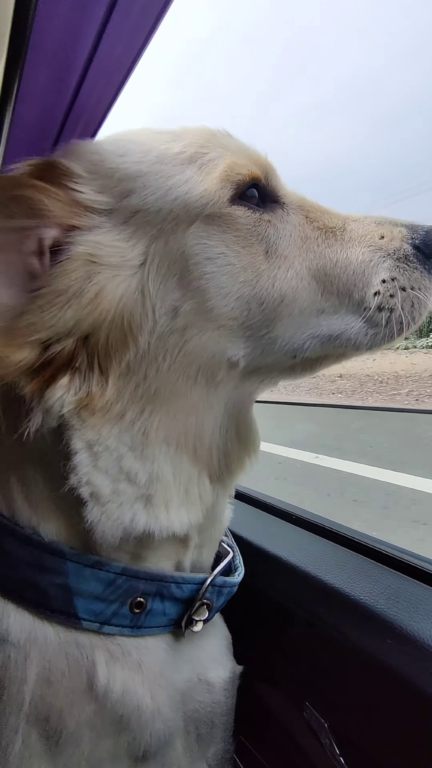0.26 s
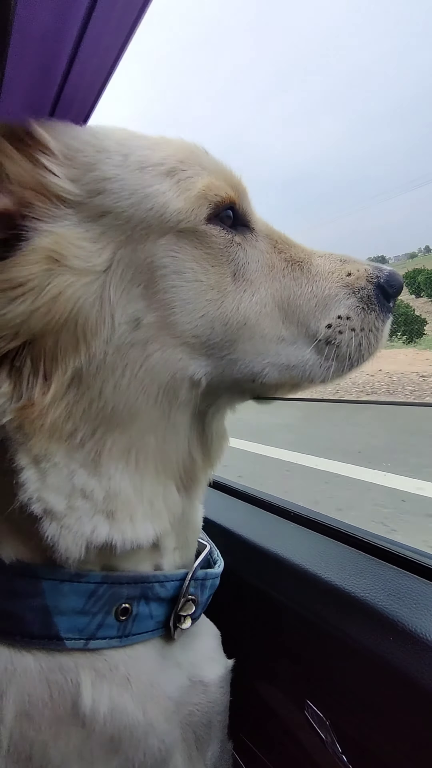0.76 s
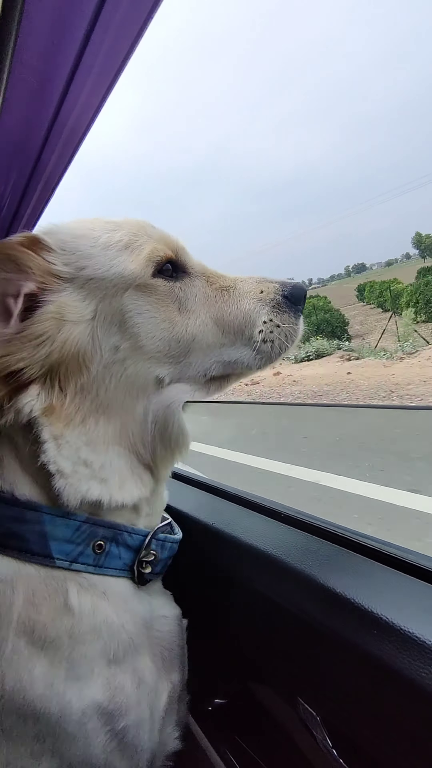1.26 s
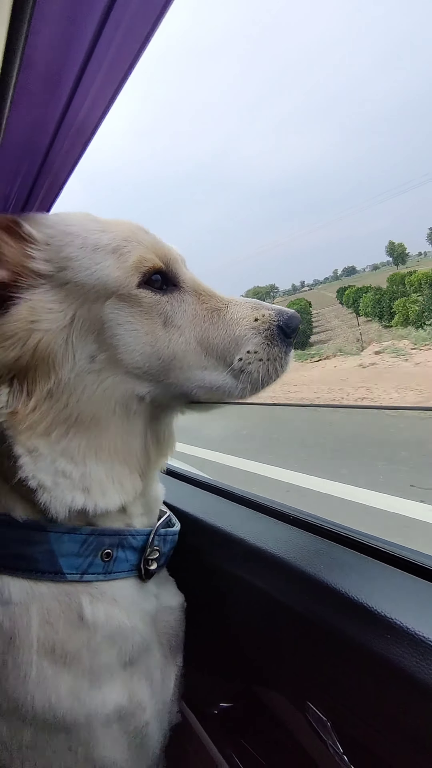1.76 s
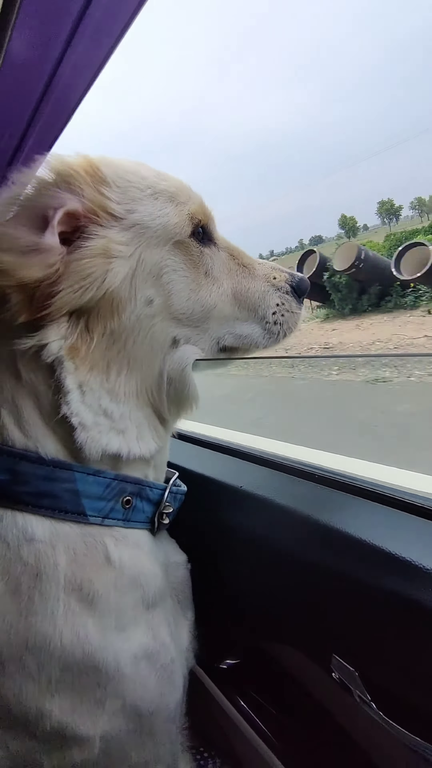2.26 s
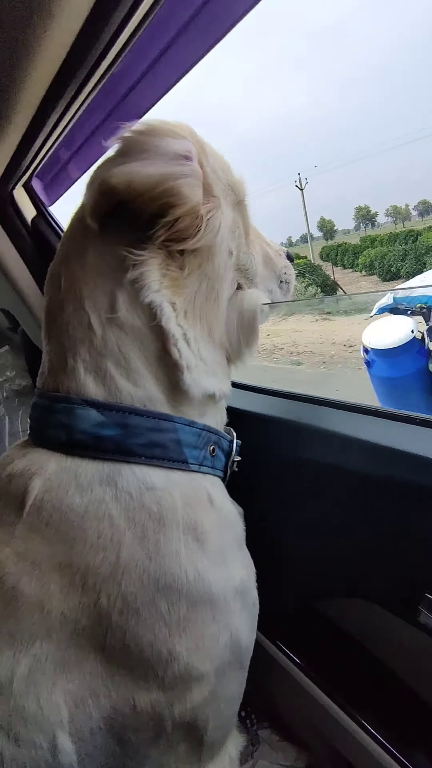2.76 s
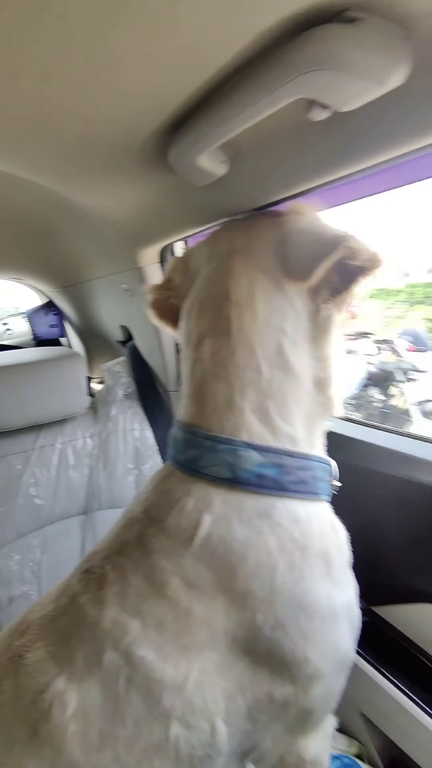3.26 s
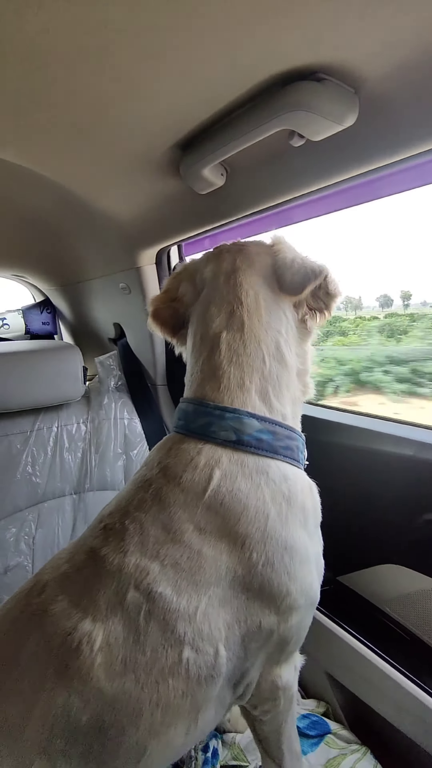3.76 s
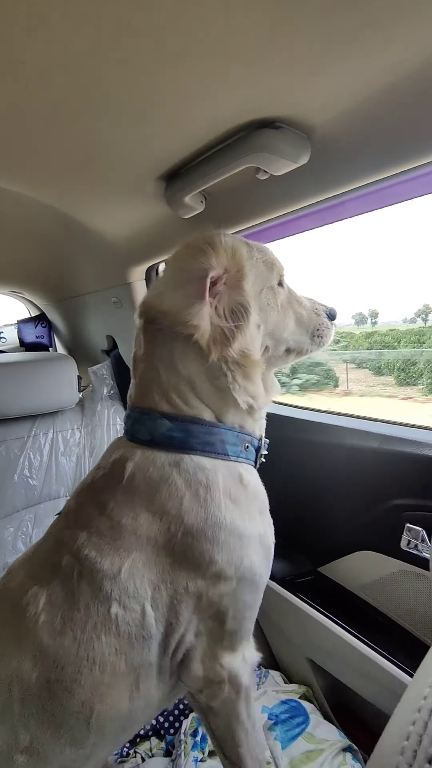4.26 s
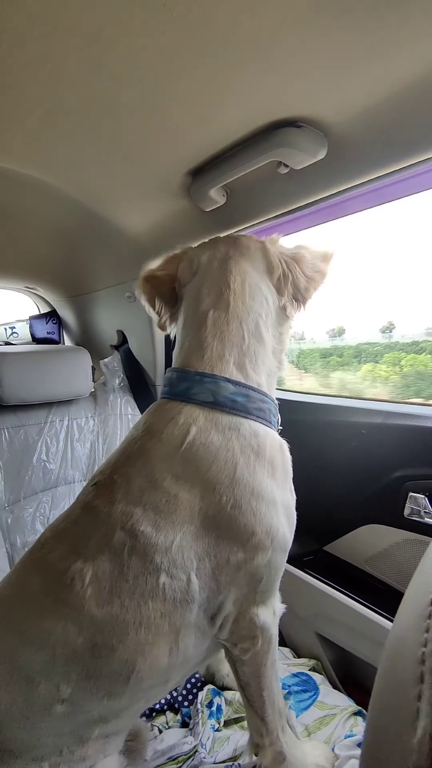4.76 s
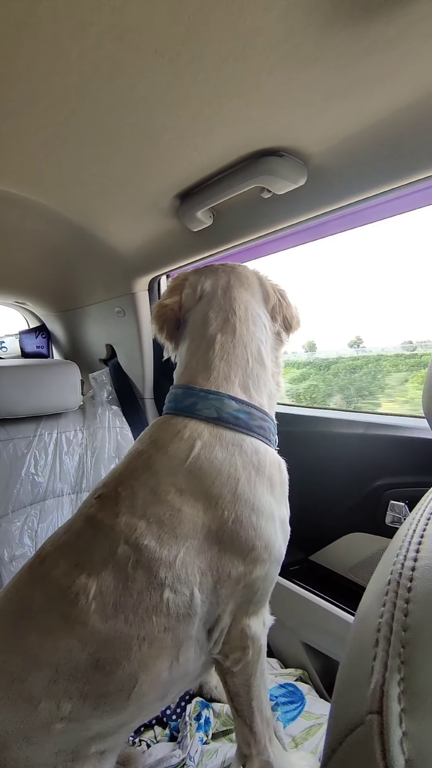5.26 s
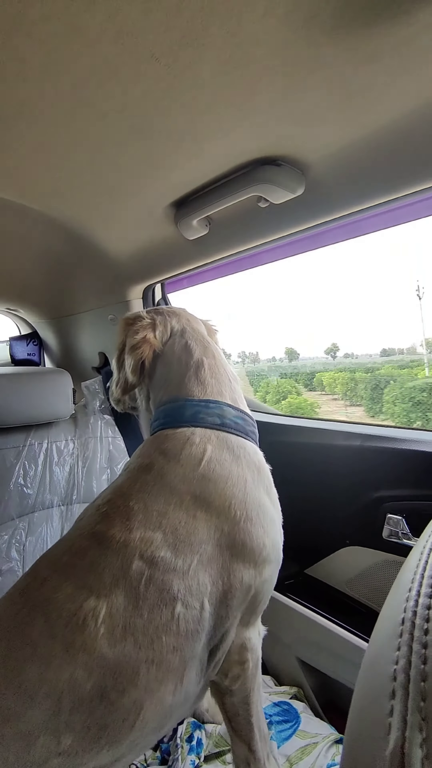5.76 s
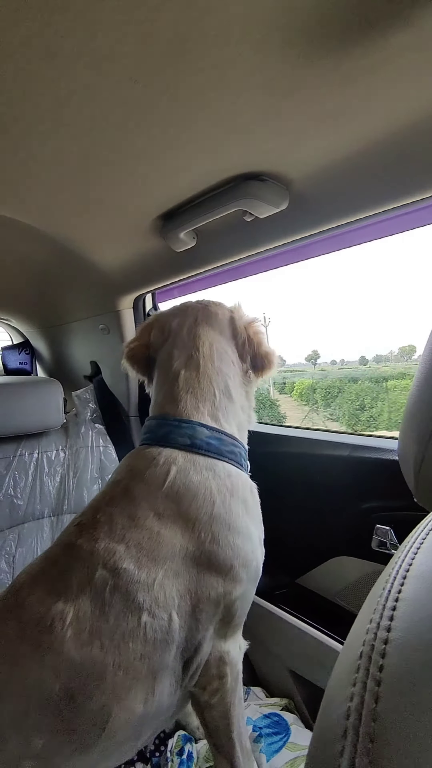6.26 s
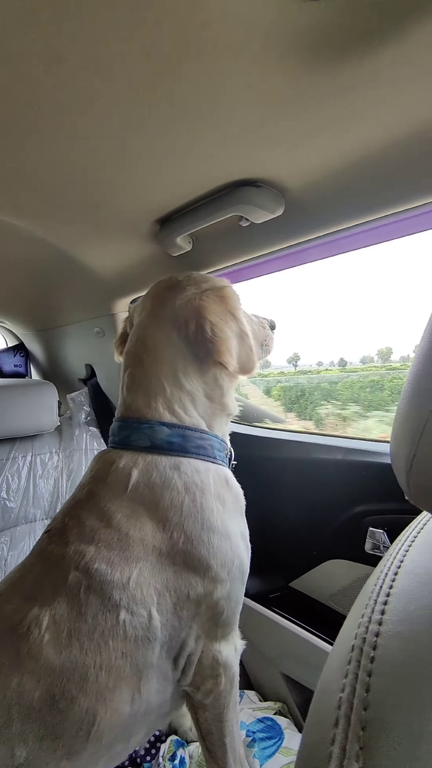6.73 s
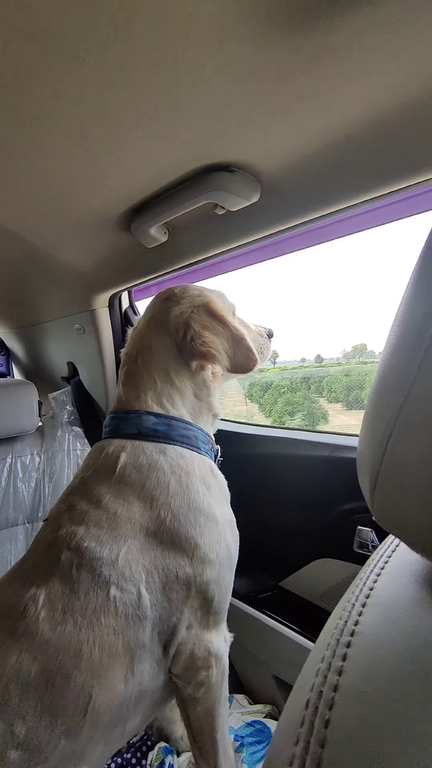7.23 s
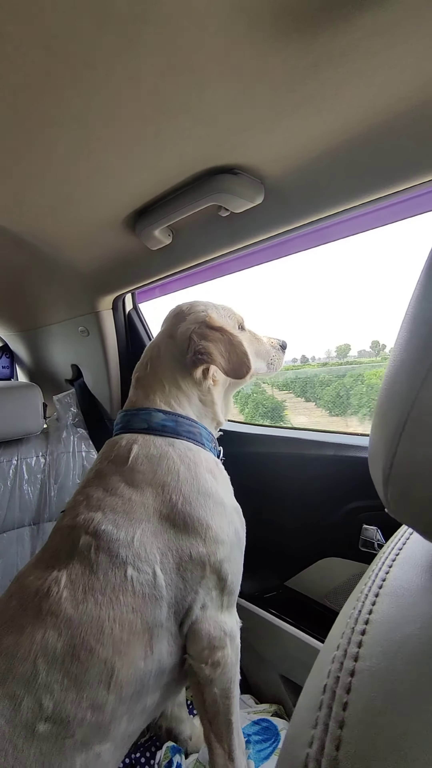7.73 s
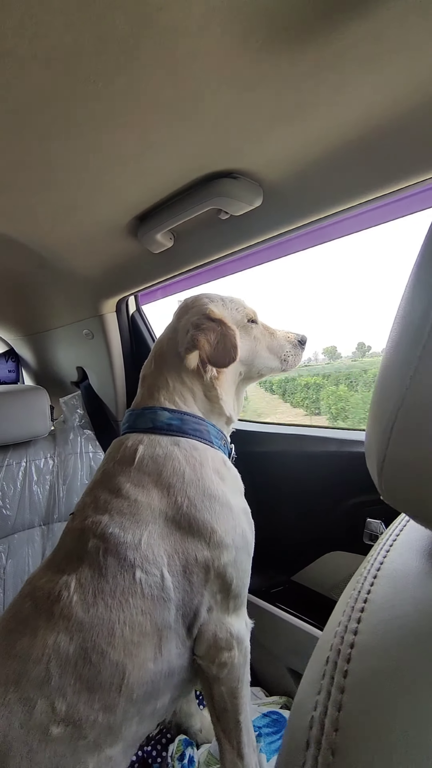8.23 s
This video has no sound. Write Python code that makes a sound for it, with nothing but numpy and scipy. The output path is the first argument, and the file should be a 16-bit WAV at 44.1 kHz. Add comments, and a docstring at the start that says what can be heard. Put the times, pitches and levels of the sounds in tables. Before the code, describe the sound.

From inside a car with one window down, deep wind buffeting and tyre rumble run throughout. A diesel tractor draws near, its exhaust droning and its engine clattering close by, with a tinny jingle and a rising rasp as it drops behind. A quick motorbike swish and a fluttering hiss of wind follow. The cabin then settles to softer rumble and gusts, with occasional light ticks and rustles.

```python
"""Inside a car on a country road, one side window down: wind buffets the cabin over low road rumble.
The car overtakes a diesel tractor, whose firings drone and bark out of the exhaust and clatter in the
engine. Loose metal jingles as it goes by; its rasp climbs as it falls behind and a faint whine lingers.
A motorbike swishes by just after it, gusts hiss over the glass, and a few rustles and ticks sound in
the cabin."""
import sys
import numpy as np
from scipy import signal
from scipy.fft import rfft, irfft, next_fast_len
from scipy.io import wavfile
from scipy.ndimage import uniform_filter1d, minimum_filter1d, map_coordinates

SR = 44100
rng = np.random.default_rng(int(sys.argv[2]) if len(sys.argv) > 2 else 0)


def unload_wav(signal):
    """Save mono or channel-first audio to the path in sys.argv[1] as 16-bit WAV at rate SR, clipped to [-1, 1]."""
    wavfile.write(
        sys.argv[1],
        SR,
        np.round(np.clip(np.atleast_2d(signal).T, -1, 1) * 32767).astype(np.int16),
    )


N = 374407
TIME = np.arange(N) / SR
SIDES = np.array([[1], [-1]]) / 2  # splits a difference between left and right


def amp(db):
    """Decibels to gain."""
    return 10 ** (np.asarray(db) / 20)


def unit(x):
    """Scale to rms 1."""
    return x / np.sqrt(np.mean(x ** 2) + 1e-20)


def along(points, hz):
    """Read a curve of (frequency, value) points on a log axis."""
    f, v = np.transpose(points)
    return np.interp(np.log(hz + 1), np.log(f + 1), v)


def curves(rows):
    """One automation lane for each column after the time."""
    times, *columns = np.transpose(rows)
    return [np.interp(TIME, times, column) for column in columns]


def wobble(rate):
    """A smooth random curve, rate knots a second."""
    return map_coordinates(rng.standard_normal(int(N * rate / SR) + 4), [np.arange(N) * rate / SR])


def swells(rows):
    """A sum of bell shapes from rows of (time, height, half length)."""
    return sum(height * np.exp(-((TIME - s) / half) ** 2 / 2) for s, height, half in rows)


def fades(rows):
    """A gain envelope of swells whose heights are given in dB."""
    return swells([(s, amp(db), half) for s, db, half in rows])


def filtered(x, response):
    """Filter x by a complex response of frequency."""
    size = 2 * next_fast_len((N + SR) // 2)
    return irfft(rfft(x, size) * response(np.fft.rfftfreq(size, 1 / SR)), size)[..., :N]


def struck(x, spectrum):
    """Filter x at minimum phase, so it rings only after each hit."""
    def response(hz):
        cepstrum = irfft(np.log(amp(along(spectrum, hz))))
        cepstrum[1:len(cepstrum) // 2] *= 2
        cepstrum[len(cepstrum) // 2 + 1:] = 0
        return np.exp(rfft(cepstrum))
    return filtered(x, response)


def ringing(modes, hz):
    """Complex response of a few resonances of alternating polarity."""
    return sum((-1) ** k * amp(db) * 1j * hz * width / (centre ** 2 - hz ** 2 + 1j * hz * width)
               for k, (centre, width, db) in enumerate(modes))


def resonate(x, modes):
    """Ring x through a few resonances, at rms 1."""
    return unit(filtered(x, lambda hz: ringing(modes, hz)))


def gliding(x, centre_hz, width_hz):
    """Ring x through one swept resonance, at rms 1."""
    carrier = np.exp(2j * np.pi * np.cumsum(centre_hz) / SR)
    lowpass = signal.butter(2, width_hz / 2, fs=SR, output="sos")
    return unit((carrier * signal.sosfilt(lowpass, x / carrier)).real)


def from_window(x, lead_ms, left_db):
    """Place x in stereo: the left side leads by lead_ms; left_db is left minus right."""
    advance = SIDES * lead_ms / 1000
    return amp(SIDES * left_db) * filtered(x, lambda hz: np.exp(2j * np.pi * hz * advance))


# How alike left and right sound: mono in the bass and top treble, wider between:
# (frequency [Hz], coherence [0-1])
COHERENCE = [(12, 1), (35, 1), (70, 1), (250, 0.93), (500, 0.63), (900, 0.68), (1500, 0.25), (5000, 0.49),
             (6200, 0.59), (8000, 0.94)]
def noise(spectrum, patchy_db):
    """Coloured stereo noise of rms 1, with eddies as patches of random gain."""
    tiles = signal.stft(rng.standard_normal((2, N)), nperseg=512)[2]
    patches = uniform_filter1d(rng.standard_normal(tiles.shape[1:]), size=7, axis=0)
    patches = uniform_filter1d(patches, size=12, axis=1)
    pair = signal.istft(tiles * amp(patchy_db * unit(patches)), nperseg=512)[1][:, :N]

    def colour_and_width(hz):
        angle = np.arccos(np.clip(along(COHERENCE, hz), -1, 1)) / 2
        return amp(along(spectrum, hz)) * [np.cos(angle), np.sin(angle)]
    mid, side = filtered(pair, colour_and_width)
    return unit(np.array([mid + side, mid - side]))


def steadied(x, seconds):
    """Even out the slow swells of a noise, keeping its quick flutter."""
    power = uniform_filter1d(np.mean(x ** 2, axis=0), size=max(int(seconds * SR), 1))
    return x / np.sqrt(np.abs(power) + 1e-6)


# Airflow at the window, also riding the road layer: (time [s], boom level [dB], rush level [dB])
AIRFLOW = [(0, -21, -45), (.6, -19, -46.5), (1.0, -17, -42), (2.5, -19.5, -42), (3.65, -18, -37.5),
           (4.14, -20, -43.5), (4.28, -26, -47), (4.5, -28.5, -53), (5.0, -31, -54.5), (6.0, -27, -55),
           (6.7, -24.5, -52.5), (7.7, -21.5, -47.5), (8.2, -21.5, -47.5), (8.49, -18.5, -48)]
# Strong gusts: (time [s], throb lift [dB], half length [s])
GUSTS = [(.31, 5, 0.07), (.56, 8.5, 0.033), (1.95, 7, 0.059), (3.62, 5.5, 0.077), (4.3, 9.5, 0.27),
         (5.1, 6.5, 0.045), (5.67, 4.5, 0.17), (6.8, 5.5, 0.28), (7.48, 5, 0.04), (8.0, 5.5, 0.061)]
# Sub-bass throb and bass boom of the cabin air: (frequency [Hz], level [dB])
THROB_EQ = [(4, -9), (11, -1), (18, 7.5), (26, -6.5), (36, -14), (55, -46.5), (90, -26.5), (200, -100.5)]
BOOM_EQ = [(18, -7.5), (30, 3), (45, -3.5), (62, -5.5), (85, -5), (120, -16.5), (170, -23), (260, -28),
           (500, -40), (1500, -110)]
def wind():
    """Air spilling through the window pumps the cabin: a gusting throb and a lumpy boom above it."""
    boom_db, _ = curves(AIRFLOW)
    throb_db = -18 + 1.5 * wobble(rate=4) + swells(GUSTS)
    throb = amp(throb_db) * steadied(noise(THROB_EQ, patchy_db=0), seconds=0.15)
    boom = amp(boom_db) * steadied(noise(BOOM_EQ, patchy_db=2), seconds=0.13)
    # eddies brush each side separately
    eddies = unit(filtered(rng.standard_normal((2, N)), lambda hz: amp(along(THROB_EQ, hz))))
    return throb + amp(throb_db - 12) * eddies + from_window(boom, lead_ms=0.13, left_db=0.5)


# Road rumble and rushing air: (frequency [Hz], level [dB])
RUMBLE_EQ = [(60, -12), (95, 8.5), (140, -1), (200, 4), (265, -4.5), (330, -8), (400, -12.5), (500, -16),
             (650, -22.5), (900, -24), (1500, -34), (3000, -67.5), (8000, -100)]
RUSH_EQ = [(250, -3.5), (400, 1), (530, 5), (680, 2.5), (950, 3.5), (1100, -3.5), (1260, -2.5), (1450, -5),
           (1700, -2), (2050, -4.5), (2650, -8.5), (3200, -16), (4000, -14), (5300, -19), (6400, -15.5),
           (7400, -31), (12000, -50.5), (15500, -59.5)]
# The cabin tips the rush to one side: (frequency [Hz], left minus right [dB])
RUSH_PAN = [(60, 5), (120, 0.5), (240, -7.5), (480, 5), (950, 6.5), (1890, -1), (3770, -3.5), (7520, 8.5),
            (15000, -2.5)]
# Note of the window frame: (frequency [Hz], width [Hz], level [dB])
FRAME_MODES = [(1249, 22, 0)]
# Extra swell of that note: (time [s], level [dB], half length [s])
WHISTLE_SWELL = [(6.911, -70, 0.48)]
def road():
    """Tyres rumble through the body while air rushes and faintly sings along the window frame."""
    boom_db, rush_db = curves(AIRFLOW)
    eddies = wobble(rate=10)
    rumble_db = -36.5 + (boom_db - boom_db.mean()) + 0.22 * eddies
    rumble = amp(rumble_db) * noise(RUMBLE_EQ, patchy_db=-0.5)
    air = filtered(noise(RUSH_EQ, patchy_db=1.9), lambda hz: amp(along(RUSH_PAN, hz) * SIDES))
    rush = amp(rush_db + 0.17 * eddies) * air
    singing = (amp(rush_db - 13.5) + fades(WHISTLE_SWELL)) * amp(1.4 * wobble(rate=3.7))
    note = filtered(rng.standard_normal((2, N)), lambda hz: ringing(FRAME_MODES, hz) * (hz < 2000))
    return from_window(rumble + rush + singing * unit(note), lead_ms=0.12, left_db=-1.7)


def metres_ahead():
    """How far the tractor is ahead of the window as the car overtakes."""
    abreast_s, overtake_m_per_s = 2.551, 4.54
    return overtake_m_per_s * (abreast_s - TIME)


# Each tractor layer beams into the window from one spot along the pass:
# layer: (base level [dB], beam boost [dB], spot ahead [m], beam half width [m], loss when hidden [dB])
TRACTOR_BEAMS = { "drone": (-28, 9, 4, 10.5, 7.5), "hollow": (-44, 23.5, 3.5, 4.5, 22.5),
                 "hum": (-39.5, 14, 9, 4.5, 19.5), "roar": (-46.5, 17.5, 9.5, 4.5, 19),
                 "growl": (-49, 16.5, -3, 2.63, 15), "murmur": (-29.5, -7.5, -5, 4.5, 2.5),
                 "blat": (-58, 23.5, 0.1, 2, 15.5), "bark": (-53.5, 28, -1.74, 2, 9),
                 "buzz": (-55, 27, -3.5, 1.1, 9), "whine": (-44, 12, 1.87, 0.5, 5),
                 "chuff": (-49, -3, -12.5, 6.5, 15.5), "rasp": (-60, 27.5, -3, 2.0, 17.5),
                 "knock": (-57, 12.5, -1, 0.9, 19), "cover": (-63, 17.5, 1.0, 0.8, 19.5),
                 "clatter": (-40.5, 6, -1, 1.1, 22), "grit": (-54, 12, -2, 2.3, 19),
                 "tyres": (-35, 3, 5, 2, 32.5), }
def passing(layer):
    """Pass-by fader of one tractor layer: 1 / distance, its beam, and the shade of the car's rear."""
    gap_m, hidden_behind_m, shade_depth_m = 3.08, 6.7, 2.6
    level_db, beam_db, spot_m, width_m, hidden_db = TRACTOR_BEAMS[layer]
    ahead = metres_ahead()
    beam = np.exp(-((ahead - spot_m) / width_m) ** 2 / 2)
    shade = 1 - np.exp(-np.maximum(-ahead - hidden_behind_m, 0) / shade_depth_m)
    return amp(level_db + beam_db * beam - hidden_db * shade) * gap_m / np.hypot(ahead, gap_m)


def strokes(firings, scatter_db, cylinders_db=(0,)):
    """One impulse at each whole count of firings, its strength set by its cylinder and by chance."""
    at = np.flatnonzero(np.diff(np.floor(firings)))
    train = np.zeros(N)
    train[at] = amp(np.resize(cylinders_db, len(at)) + scatter_db * rng.standard_normal(N)[:len(at)])
    return train


def bursts(firings, scatter_db, rise_s, decay_s, cylinders_db=(0,)):
    """An envelope of rms 1 that jumps at each firing and dies within milliseconds."""
    t = np.arange(SR // 20) / SR
    shape = np.exp(-t / decay_s) * (1 - np.exp(-t / rise_s))
    return unit(signal.fftconvolve(strokes(firings, scatter_db, cylinders_db), shape)[:N])


# Body of one exhaust thump: (frequency [Hz], level [dB])
THUMP_EQ = [(25, -29.5), (50, -6.5), (100, 6.5), (150, 0.5), (200, -5), (250, -6.5), (300, -3), (350, -11),
            (400, -25.5), (450, -25), (560, -24), (750, -41.5), (1200, -45), (3000, -83.5)]
# Resonances along the exhaust: (frequency [Hz], width [Hz], level [dB])
CHAMBER_MODES = [(254.8, 24.7, 0)]
SILENCER_MODES = [(349.7, 35, 4.5), (382.4, 45, 1.5), (464, 37.5, 3.5), (694, 66, -11.5)]
TAILPIPE_MODES = [(329, 53, 0)]
MURMUR_MODES = [(200.4, 49, -3), (308, 34, -6.5)]
def exhaust_drone(firings):
    """Firings thump through the exhaust: the silencer hums forward, the tailpipe growls backward."""
    thumps = struck(strokes(firings, scatter_db=1.26), THUMP_EQ)
    return (passing("drone") * unit(thumps)
            + passing("hollow") * resonate(thumps, CHAMBER_MODES)
            + passing("hum") * resonate(strokes(firings, scatter_db=2), SILENCER_MODES)
            + passing("growl") * resonate(thumps, TAILPIPE_MODES)
            + passing("murmur") * resonate(thumps, MURMUR_MODES))


# Breath of the silencer: (frequency [Hz], level [dB])
ROAR_EQ = [(150, -22), (270, 6), (340, -4), (430, 0), (520, -8.5), (900, -48.5)]
def silencer_roar(gas):
    """A breathy roar that pulses with the gas in the silencer."""
    return passing("roar") * unit(1 + gas) * noise(ROAR_EQ, patchy_db=2.5)


# Gas leaving the exhaust: (frequency [Hz], level [dB])
CHUFF_EQ = [(250, -10), (420, 11.5), (560, 7), (720, -1.5), (900, -8), (1080, -6.5), (1400, -7.5),
            (1750, -15), (2050, -4), (2300, 9), (2600, -19), (2900, -8), (3300, -23), (5000, -29),
            (9000, -59)]
def exhaust_chuff(gas):
    """Turbulent gas follows each pressure pulse out of the pipe."""
    return passing("chuff") * gas * noise(CHUFF_EQ, patchy_db=2.5)


# Tractor tyres on the road: (frequency [Hz], level [dB])
TYRE_EQ = [(250, -8.5), (600, 7.5), (900, 6), (1100, 0), (1450, -0.5), (1700, 0), (2500, -11),
           (3200, -38.5), (5300, -7), (6400, -18), (7400, -17), (15500, -35.5)]
def tractor_tyres():
    """The rolling tyres lay a wash of noise under the engine."""
    return passing("tyres") * noise(TYRE_EQ, patchy_db=2)


# Gear noise, combustion knock and the finest rattle: (frequency [Hz], level [dB])
GEAR_EQ = [(400, -4), (1000, -5), (1400, -1), (1750, 2.5), (2400, -4), (2900, 4.5), (3300, -0.5),
           (4000, 2.5), (5300, 2.5), (6050, 6.5), (6650, 8.5), (7300, -24), (11000, -15.5), (15500, -33)]
KNOCK_EQ = [(900, -17), (1900, -13), (2300, -8.5), (2600, 1), (3050, 7.5), (3800, -6), (5200, -9),
            (6400, 7), (7300, -22.5), (12000, -28), (15500, -30.5)]
GRIT_EQ = [(4000, -23.5), (7000, 5), (8500, 3), (11500, -6.5), (15500, -5.5)]
# Knock accent of each of the three cylinders: (level [dB])
CYLINDERS_DB = [0, 2.5, -1]
# Ring of an engine cover: (frequency [Hz], width [Hz], level [dB])
COVER_MODES = [(2270, 78, -1), (3030, 290, -7.5)]
def engine_clatter(firings):
    """Combustion knocks in the block and rings a cover, over pulsing gear noise and fine grit."""
    beat = unit(1 + 0.45 * bursts(firings, scatter_db=2.5, rise_s=0.001, decay_s=0.003))
    gears, block, rattle = (noise(eq, patchy_db=2.2) for eq in (GEAR_EQ, KNOCK_EQ, GRIT_EQ))
    raps = bursts(firings, scatter_db=1.5, rise_s=0.0004, decay_s=0.0025, cylinders_db=CYLINDERS_DB)
    clatter = passing("clatter") * beat * gears + passing("knock") * raps * block
    cover = passing("cover") * resonate(raps * rng.standard_normal(N), COVER_MODES)
    flicker = amp(1.3 * wobble(rate=25) + 2.2 * wobble(rate=700))
    grit = passing("grit") * unit(beat * flicker) * rattle
    return from_window(clatter + cover, lead_ms=0.49, left_db=8.5) + grit


# Ring of the pipe and the short, direct blat of each pulse: (frequency [Hz], level [dB])
BARK_EQ = [(200, -62.5), (450, -8), (500, -9.5), (590, -12), (650, -2), (700, -8), (745, -2.5), (795, 1.5),
           (845, 5), (895, 4.5), (945, -10), (1000, -15), (1150, -30), (2000, -51.5), (5000, -78.5)]
BLAT_EQ = [(300, -30.5), (450, -8.5), (600, -2.5), (690, 3.5), (745, 0), (850, -3), (940, 1), (1040, -17.5),
           (1600, -31.5), (5000, -70.5)]
# The pipe's narrow whine and broader buzz: (frequency [Hz], width [Hz], level [dB])
WHINE_MODES = [(810, 81, 0)]
BUZZ_MODES = [(844, 190, 0)]
def pipe_bark(pops):
    """Each pressure pulse rings the exhaust pipe, hardest alongside the window."""
    barks = struck(pops, BARK_EQ)
    return (passing("bark") * unit(barks)
            + passing("whine") * resonate(barks, WHINE_MODES)
            + passing("buzz") * resonate(barks, BUZZ_MODES)
            + passing("blat") * unit(struck(pops, BLAT_EQ)))


def pipe_rasp(pops, gas):
    """Pulses and turbulence rasp on the pipe's mouth, sweeping up as the tractor falls behind."""
    low_hz, high_hz, width_hz = 850, 1200, 220
    halfway_behind_m, climb_scale_m = 3.27, 0.42
    climb = (1 - np.tanh((metres_ahead() + halfway_behind_m) / climb_scale_m / 2)) / 2
    centre_hz = low_hz + (high_hz - low_hz) * climb
    jet = (1 + gas) * noise(RUSH_EQ, patchy_db=2)
    turbulence = amp(-1) * gliding(jet, centre_hz, width_hz)
    return passing("rasp") * (gliding(pops, centre_hz, width_hz) + turbulence)


# Pulse of the diesel: (time [s], firing rate [Hz])
FIRING_RATE = [(0, 49.63), (.5, 49.8), (1.4, 49.96), (2.3, 49.77), (3.0, 49.37), (3.6, 49.4), (6, 49.41)]
def tractor():
    """The tractor's submix: one firing clock drives exhaust and engine over the tyre noise."""
    rate_hz, = curves(FIRING_RATE)
    firings = np.cumsum(rate_hz) / SR + 0.855
    outflow = firings - 0.06  # lags by a fraction of a firing
    drone = exhaust_drone(firings)
    pops = strokes(outflow, scatter_db=0.5)
    gas = bursts(outflow, scatter_db=1.5, rise_s=0.0005, decay_s=0.003)
    chuff = exhaust_chuff(gas)
    return (from_window(drone + silencer_roar(gas), lead_ms=0.23, left_db=2.5)
            + from_window(chuff + pipe_bark(pops) + pipe_rasp(pops, gas), lead_ms=0.25, left_db=0)
            + engine_clatter(outflow)
            + from_window(tractor_tyres(), lead_ms=0.31, left_db=2))


# Rustles in the cabin: (time [s], level [dB], half length [s])
RUSTLES = [(0.04, -47, 0.027), (0.733, -41.5, 0.043), (1.11, -42.5, 0.07), (1.746, -42, 0.048),
           (7.902, -44.5, 0.03), (7.987, -57.5, 0.035), (8.356, -61, 0.27)]
# Small ticks: (time [s], level before trim [dB], time to fall 60 dB [s])
TICKS = [(5.228, -46.5, 0.072), (6.068, -50.5, 0.098), (7.3, -61, .06)]
# Scuffing texture of both: (frequency [Hz], level [dB])
SCUFF_EQ = [(700, -3), (1700, -1), (2400, -0.5), (3200, -8), (4300, 0.5), (5200, -3), (6200, 5.5),
            (7000, -11), (8000, -14), (14000, -25.5)]
def rustles_and_ticks():
    """Soft, grainy rustles swell and fade; small ticks snap and die at once."""
    scuff = noise(SCUFF_EQ, patchy_db=2.5)
    rustles = fades(RUSTLES) * amp(wobble(rate=300))
    ticks = sum(amp(db - 60 * np.abs(TIME - s) / t60) * (TIME >= s) for s, db, t60 in TICKS)
    return (rustles + amp(-3.5) * ticks) * scuff


# Shakes of loose metal: (time [s], level [dB], half length [s])
JINGLES = [(2.619, -30, 0.0048), (2.714, -34, 0.013), (2.792, -32.5, 0.011), (3.055, -34.5, 0.012)]
# Its tinny ring: (frequency [Hz], width [Hz], level [dB])
TIN_MODES = [(6100, 360, 2), (6600, 330, 1.5)]
def metal_jingles():
    """Loose metal shivers in short, tinny bursts as the tractor goes by."""
    ring = resonate(rng.standard_normal((2, N)), TIN_MODES)
    return from_window(fades(JINGLES) * ring, lead_ms=0.83, left_db=9.5)


# Gusts on the glass: (time [s], level [dB], half length [s])
HISSES = [(3.243, -39.5, 0.18), (3.95, -58, 0.097), (4.157, -48, 0.025), (8.1, -68, 0.59)]
# Their bright colour: (frequency [Hz], level [dB])
HISS_EQ = [(1200, -23), (2400, -7), (3300, -0.5), (4600, -4), (6400, 2), (7500, -12), (15000, -17)]
def glass_hiss():
    """Gusts tear over the edge of the glass with a fluttering hiss."""
    flutter = amp(1.8 * wobble(rate=28) + 1.5 * wobble(rate=150))
    hiss = fades(HISSES) * flutter * noise(HISS_EQ, patchy_db=4)
    return from_window(hiss, lead_ms=0.3, left_db=-2)


# The motorbike's tyres and engine as one swish: (frequency [Hz], level [dB])
SWISH_EQ = [(300, -12), (520, -2.5), (750, -9), (1020, -11.5), (1180, 3), (1380, -14.5), (2200, -10.5),
            (3200, -10.5), (4000, -12), (6400, -9), (8000, -23.5), (15000, -34.5)]
def motorbike():
    """A brief swish close to the window, swelling and falling with distance."""
    closest_s, closest_db, pass_s, db_per_doubling = 3.3, -37, 0.29, 11
    distance = np.hypot(1, (TIME - closest_s) / pass_s)  # 1 at the closest point
    swish = from_window(noise(SWISH_EQ, patchy_db=3.5), lead_ms=0.32, left_db=-1.5)
    return amp(closest_db - db_per_doubling * np.log2(distance)) * swish


def scene():
    """The full mix, heard from the back seat."""
    bed = wind() + road() + glass_hiss()
    return bed + tractor() + metal_jingles() + motorbike() + rustles_and_ticks()


def record(dry):
    """A limiter ducks the biggest gusts; a brick-wall low-pass cuts the very top."""
    ceiling, top_hz = 0.88, 15550
    needed = np.minimum(1, ceiling / (np.abs(dry).max(axis=0) + 1e-9))
    held = minimum_filter1d(needed, size=1801)
    gain = uniform_filter1d(uniform_filter1d(held, size=901), size=901)
    return filtered(dry * gain, lambda hz: hz < top_hz)


dry = scene()
out = record(dry)
unload_wav(out)
```